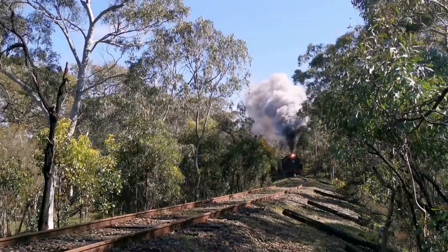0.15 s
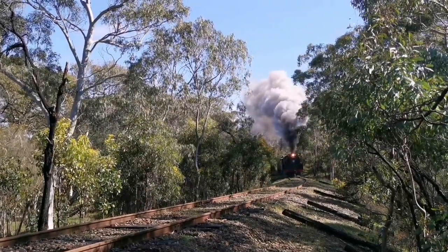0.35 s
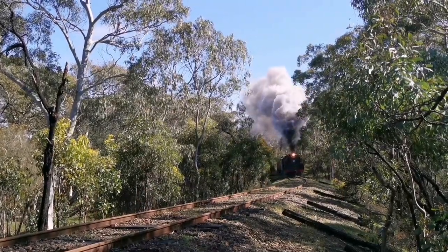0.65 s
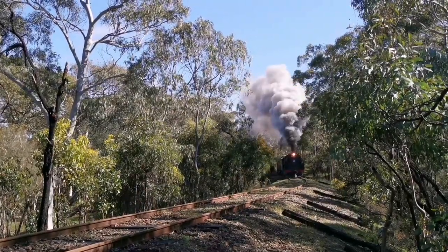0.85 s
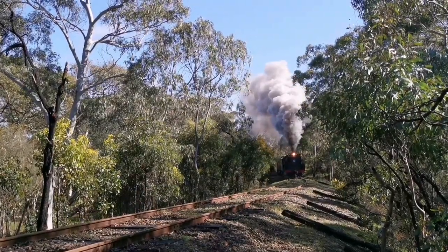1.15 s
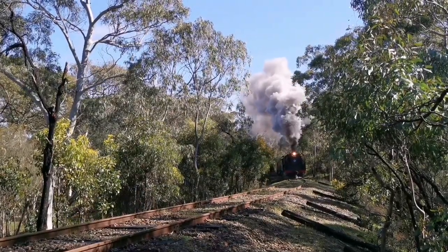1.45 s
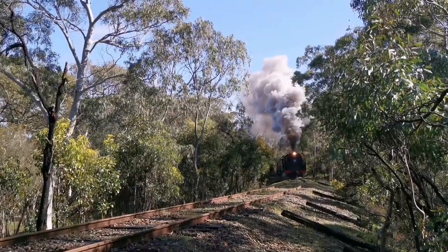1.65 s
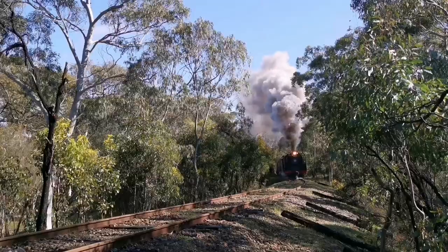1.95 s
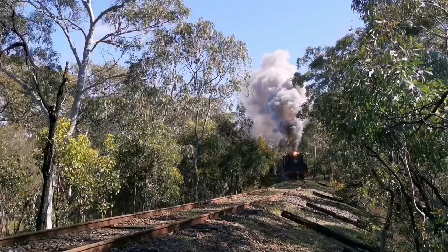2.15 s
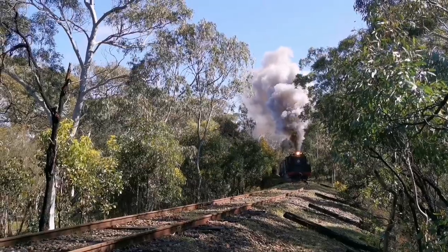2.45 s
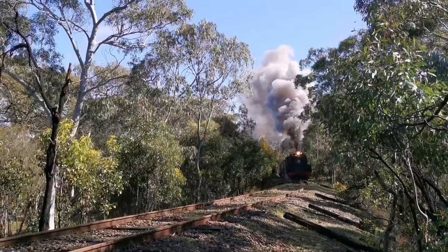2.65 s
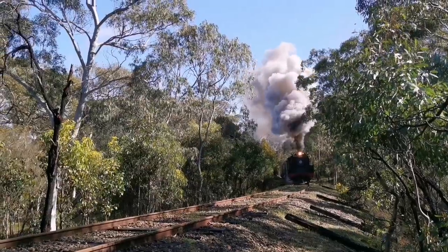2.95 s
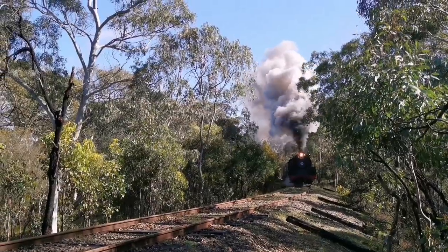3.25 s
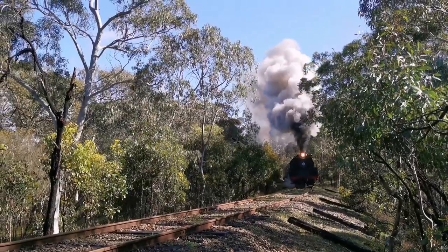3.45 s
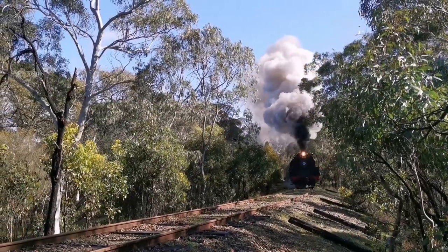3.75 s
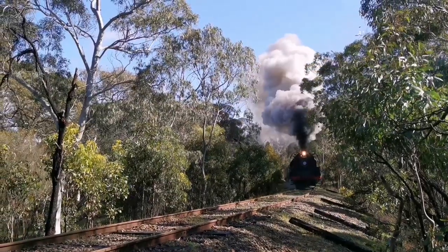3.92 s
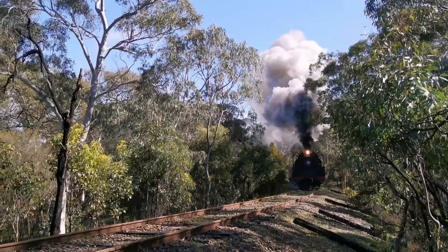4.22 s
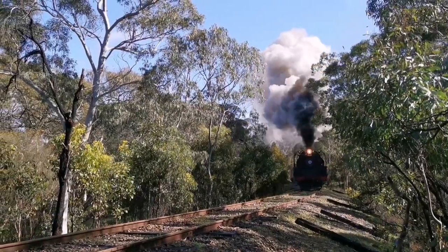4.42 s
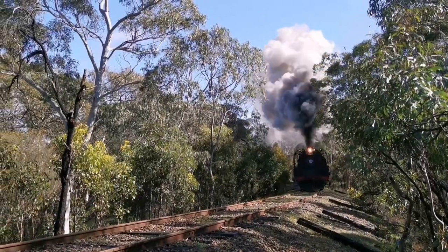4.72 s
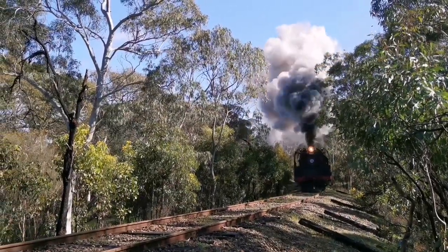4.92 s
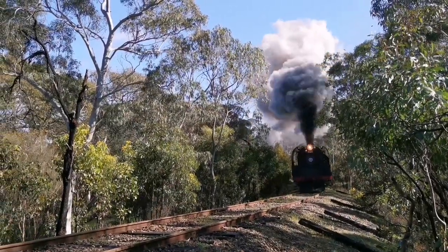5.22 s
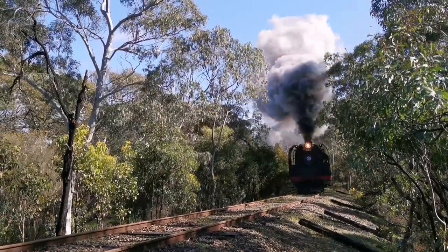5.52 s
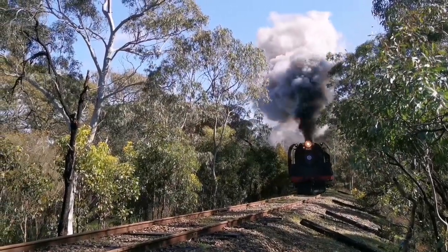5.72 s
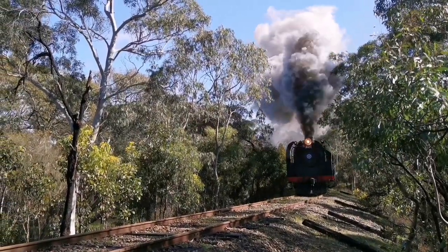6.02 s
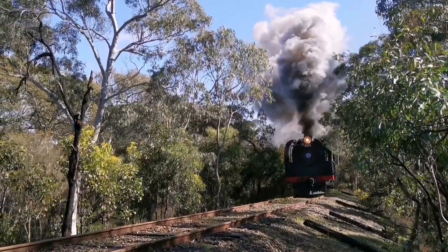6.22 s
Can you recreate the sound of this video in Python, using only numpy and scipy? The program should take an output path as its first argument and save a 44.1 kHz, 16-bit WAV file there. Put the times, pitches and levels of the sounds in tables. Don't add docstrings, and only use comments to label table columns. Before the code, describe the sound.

A steam locomotive works uphill toward a fixed stereo microphone beside a wooded track. Rapid, even exhaust chuffs, about five and a half a second in uneven groups of four, blast as rough hissing noise. Hollow low booms and soft pops flutter beneath, with wheel and rod rumble pulsing along. Everything gradually gets louder and fuller, blurred by short tree echo.

```python
import sys
import numpy as np
from scipy import signal
from scipy.fft import rfft, irfft, next_fast_len
from scipy.io import wavfile
from scipy.ndimage import uniform_filter1d, map_coordinates

SR = 44100
rng = np.random.default_rng(int(sys.argv[2]) if len(sys.argv) > 2 else 0)


def undo_db(level):
    steps = np.asarray(level, float) / 20
    return 10 ** steps


def wav_record(signal):
    frames = np.transpose(np.atleast_2d(signal))
    bounded = np.clip(frames, -1, 1)
    quanta = np.round(bounded * 32767).astype(np.int16)
    wavfile.write(sys.argv[1], SR, quanta)


N = 280910
TIME = np.arange(N) / SR

# beat 1 [level/dB], beat 2, beat 3, beat 4
STEAM = [
    (-45.5, -51, -46.5, -47),
    (-45.5, -51.5, -45, -46),
    (-46.5, -51, -46, -48),
    (-45, -50.5, -43, -44.5),
    (-44.5, -50.5, -45.5, -46.5),
    (-44.5, -51, -46.5, -47.5),
    (-45, -49, -43, -44.5),
    (-43, -48, -42.5, -42.5),
    (-41, -47.5, -43, -43.5),
]
# valve early [t/s], roar [level/dB], body [level/dB], blast longer [t/s]
CYLINDER_ENDS = [(0.019, -0.2, 0.35, 0.00074), (0.021, 2.1, -0.55, 0.00062), (0.016, -0.3, 0, 0.0032),
                 (0.016, -0.06, -0.05, -0.0034)]
# [t/s], roar over steam strength [level/dB], blast length [t/s]
WORKING = [
    (0, 11.5, 0.048),
    (.9, 8.5, 0.052),
    (1.8, 11.5, 0.044),
    (2.8, 9, 0.035),
    (3.6, 9, 0.043),
    (4.2, 7, 0.051),
    (5.2, 5, 0.053),
    (5.7, 5, .052),
    (6.4, 6.5, .064),
]
# [t/s], sizzle freed from air loss [level/dB], smokebox drone [level/dB]
APPROACH = [
    (0, -2.5, 6),
    (.8, -0.5, 8),
    (1.6, 2.5, 9.5),
    (2.4, 3, 11),
    (3.2, 3, 12),
    (4, 5, 12.5),
    (4.8, 3.5, 10),
    (5.6, 4.5, 10.5),
    (6.4, 3, 14.5),
]

# [f/Hz], [level/dB per Hz]
JET_LEFT = [(200, 3.5), (330, 2), (600, -4.5), (1000, -3.5), (1500, -1), (2500, -4), (3500, -9.5),
            (5000, -13.5), (6000, -19), (7300, -27), (7700, -42), (8200, -60), (9000, -45), (12200, -49),
            (13000, -64)]
# [f/Hz], [level/dB per Hz]
JET_RIGHT = [(200, 1), (330, 1), (650, -3), (1100, -5.5), (1700, -1), (2700, -7.5), (4000, -11.5),
             (5500, -4.5), (6600, -11), (7300, -21.5), (7700, -29.5), (10900, -22.5), (12400, -33),
             (13100, -49)]
# delay [t/ms], gain [ratio], dulling [f/Hz]
LEFT_WAYS = [(0.036, -0.54, 3580), (0.114, 0.97, 3620), (0.753, -0.003, 4300.0), (1.365, 0.15, 4000),
             (1.782, 0.32, 2400), (2.756, 0.22, 4320.0)]
# delay [t/ms], gain [ratio], dulling [f/Hz]
RIGHT_WAYS = [(0.027, 0.22, 20000.0), (0.225, 0.99, 2050), (1.029, -0.13, 7600), (1.267, 0.11, 10130.0),
              (1.72, 0.96, 1780), (2.976, 0.43, 3500)]
# [f/Hz], share of the common sound [ratio]
SCATTER = [(200, 0.089), (500, 0.18), (1500, 0.45), (4000, 0.29), (6000, 0.66), (8000, 1.2)]
# [f/Hz], fall by 60 dB [t/s]
TREES = [(150, 0.85), (600, 0.89), (2000, 1), (6000, 0.76), (12000, 0.77)]

# [f/Hz], width [f/Hz], [level/dB]
SMOKEBOX = [(205, 56, -5.5), (162, 23, -11.5), (97, 50, -22)]
# [t/s], peak [level/dB], pitch [f/Hz], half-height length [t/s]
PUFFS = [(0.031, -24.5, 212, 0.021), (0.21, -30, 162, 0.036), (0.411, -26.5, 206, 0.038),
         (0.576, -26.5, 199, 0.016), (0.766, -25, 218, 0.022), (1.129, -22, 208, 0.031),
         (1.474, -24.5, 180, 0.025), (1.693, -27.5, 203, 0.019), (2.015, -24, 210, 0.048),
         (2.225, -26, 217, 0.029), (2.603, -25, 172, 0.025), (2.746, -25.5, 226, 0.034),
         (3.101, -25, 215, 0.025), (3.134, -28, 200, 0.029), (3.3, -24, 220, 0.022),
         (3.657, -21, 205, 0.037), (3.859, -24.5, 187, 0.021), (4.207, -21, 201, 0.034),
         (4.445, -31, 195, 0.099), (4.759, -22, 202, 0.02), (4.792, -26.5, 198, 0.034),
         (4.912, -18.5, 206, 0.022), (4.948, -24, 208, 0.037), (5.097, -20, 198, 0.057),
         (5.482, -18, 209, 0.029), (5.611, -26.5, 201, 0.037), (6.023, -22, 189.6, 0.057),
         (6.193, -18.5, 198, 0.044), (6.28, -30, 183, 0.024), (6.343, -26, 223, 0.03)]
# [t/s], peak [level/dB]
POPS = [(0.376, -29.5), (0.62, -28), (0.67, -28.5), (0.793, -28), (1.166, -27), (1.498, -26.5),
        (1.646, -25.5), (1.827, -27), (1.855, -28), (1.881, -23), (1.997, -25), (2.195, -25.5), (2.4, -24),
        (2.563, -24), (2.923, -21.5), (3.46, -19), (4.004, -21), (4.07, -23.5), (4.17, -28), (4.53, -26),
        (4.555, -17), (4.72, -28), (5.302, -24), (5.654, -25), (5.832, -20.5), (5.878, -18.5), (5.801, -26),
        (5.967, -22.5), (5.986, -22.5)]
# [f/Hz], [level/dB per Hz]
RUMBLE = [(8, -22), (16, -2.5), (30, -1.5), (45, -6), (70, -1), (100, -4), (135, -4), (175, -30),
          (310, -120)]

# [f/Hz], [level/dB]
PORT_HISS = [(6000, -110), (8250, -105), (8500, -70.5), (12000, -72), (15000, -70), (15700, -78)]
# [f/Hz], [level/dB]
MASKED = [(2500, -30.5), (3500, -18), (5000, -31), (7000, -23), (7700, -10), (8600, -4.5), (10500, 0),
          (11500, 1), (12600, -9), (14500, -2)]
# [f/Hz], [level/dB]
FAINTEST_LEFT = [(5000, -83), (6600, -71), (7300, -62), (8200, -62), (8500, -66), (11500, -68),
                 (16000, -68.5)]
# [f/Hz], [level/dB]
FAINTEST_RIGHT = [(5000, -90), (7300, -68), (7700, -57), (8300, -67), (8600, -68), (11100, -69),
                  (11400, -53), (12700, -54), (13000, -70), (16000, -69)]

BEAT_S, OPENING_S = 0.1808, 0.015
BODY_HZ, HISS_HZ, SIZZLE_HZ = 950, 3800, 7880
BODY_DB, BODY_DB_PER_S, BODY_FOLLOWS = -40, 0.44, 0.22
SURGE_DB, SURGES_PER_S = 1.08, 90
JOINT_HZ = 5150
POP_HZ, POP_S = 193, 0.0135
THRUST_DB, THRUST_DB_PER_S, THRUST_FOLLOWS = -39, 0.54, 0.4
ROLL_DB, THRUST_LAG_S = -46, -0.0077


def unit(x):
    return x / np.sqrt(np.mean(x ** 2) + 1e-20)


def along(points, hz):
    f, v = np.transpose(points)
    return np.interp(np.log(hz + 1), np.log(f + 1), v)


def filtered(x, response):
    m = next_fast_len(N + SR // 10)
    hz = np.fft.rfftfreq(m, 1 / SR)
    return irfft(rfft(x, m) * response(hz), m)[..., :N]


def above(hz, edge_hz, order=6):
    return 1 / (1 + (edge_hz / (hz + 1)) ** order)


def patchy(count, depth_db):
    z = signal.stft(rng.standard_normal((count, N + 512)), nperseg=512)[2]
    field = rng.standard_normal((2, *z.shape[1:]))
    eddies = uniform_filter1d(uniform_filter1d(field[0], size=3, axis=0), size=5, axis=1)
    billows = uniform_filter1d(uniform_filter1d(field[1], size=9, axis=0), size=12, axis=1)
    gain_db = depth_db * (unit(eddies) + 0.64 * unit(billows))
    return unit(signal.istft(z * undo_db(gain_db), nperseg=512)[1][:, :N])


def beats():
    steam = np.ravel(STEAM)
    early, end_roar, end_body, longer = np.tile(np.transpose(CYLINDER_ENDS), len(STEAM))
    start = np.arange(len(steam)) * BEAT_S - early
    at, over, hold = np.transpose(WORKING)
    roar = steam + end_roar + np.interp(start, at, over)
    body = BODY_DB + BODY_DB_PER_S * start + BODY_FOLLOWS * (steam - steam.mean()) + end_body
    return start, np.interp(start, at, hold) + longer, roar, body, steam


def blast(level_db, fall_s, slower, ragged_s=0.0016, late_s=0):
    power = np.zeros(N)
    starts, holds = beats()[:2]
    lags = ragged_s * rng.standard_normal(len(starts))
    for s, hold, db, lag in zip(starts + late_s, holds, level_db, lags):
        span = slice(max(round((s - 0.06) * SR), 0), round((s + 0.69) * SR))
        t = TIME[span] - s
        rise = 1 / (1 + np.exp((0.92 * OPENING_S + lag - t) / (slower * 0.007)))
        emptying_s = np.clip(t - OPENING_S - hold + 0.001, 0, None)
        power[span] += (undo_db(db - 60 * emptying_s / fall_s) * rise) ** 2
    return np.sqrt(power)


def jet():
    roar, body, steam = beats()[2:]
    clear_air = undo_db(np.interp(TIME, *np.transpose(APPROACH)[:2]))
    noise = patchy(count=3, depth_db=2.1)
    registers = [
        (blast(body + 1.26, fall_s=1.0, slower=0.68),
         lambda f: 1 - above(f, BODY_HZ)),
        (blast(roar, fall_s=0.22, slower=1.12),
         lambda f: above(f, BODY_HZ) - above(f, HISS_HZ)),
        (blast(steam + 8.4, fall_s=0.27, slower=1.0),
         lambda f: above(f, HISS_HZ) - above(f, SIZZLE_HZ, order=30)),
        (clear_air * blast(steam + 9.37, fall_s=0.34, slower=1.5),
         lambda f: above(f, SIZZLE_HZ, order=30))]
    surge_db = SURGE_DB * map_coordinates(rng.standard_normal(N // 100), [TIME * SURGES_PER_S])
    gated = sum(flow * filtered(noise, lambda f: np.sqrt(abs(share(f)))) for flow, share in registers)
    return undo_db(surge_db) * gated


def ways(table, hz):
    comb = sum(g * np.exp(-(hz / dull) ** 2 - 2j * np.pi * hz * ms / 1000) for ms, g, dull in table)
    width = round(600 / hz[1])
    slope = uniform_filter1d(uniform_filter1d(np.log(abs(comb) + 1e-9), width), width)
    return np.where(hz < JOINT_HZ, comb / np.exp(slope), 1)


def trees(x, channels):
    hz, t, z = signal.stft(rng.standard_normal((channels, SR)), SR, nperseg=256)
    fall = undo_db(-60 * t / along(TREES, hz)[:, None])
    tail = signal.istft(z * fall, SR, nperseg=256)[1]
    tail *= 1 - np.exp(-np.arange(tail.shape[1]) / (0.019 * SR))
    return signal.fftconvolve(x[None], tail / np.linalg.norm(tail[0]), axes=1)[:, :N]


def chimney():
    shared, *own = jet()
    ports = lambda f: np.array([ways(LEFT_WAYS, f), ways(RIGHT_WAYS, f)])
    scattered = filtered(np.array(own), lambda f: along(SCATTER, f))
    echo = undo_db(-7.5) * trees(shared, channels=2)
    grazing = filtered(scattered + echo, lambda f: abs(ports(f)) ** 0.45)
    port_gain = lambda f: undo_db([along(JET_LEFT, f), along(JET_RIGHT, f)])
    colour = lambda f: port_gain(f) / np.sqrt(1 + along(SCATTER, f) ** 2)
    return undo_db(12) * filtered(filtered(shared, ports) + grazing, colour)


def smokebox():
    modes = lambda f: sum(undo_db(db) * 1j * f * w / (c * c - f * f + 1j * f * w) for c, w, db in SMOKEBOX)
    steep = lambda f: modes(f) * (1 - above(f, 275.0, order=10))
    drone_db = np.interp(TIME, *np.transpose(APPROACH)[::2])
    flow = blast(np.full(np.size(STEAM), -43), fall_s=0.47, slower=1.44)
    boom = undo_db(drone_db) * flow * unit(filtered(rng.standard_normal(N), steep))
    puffs = PUFFS + [(s, db, POP_HZ, POP_S) for s, db in POPS]
    phases = rng.uniform(0, 2 * np.pi, len(puffs))
    for (s, db, hz, length), phase in zip(puffs, phases):
        span = slice(max(round((s - 0.08) * SR), 0), round((s + 0.08) * SR))
        t = TIME[span] - s
        swell = np.exp(-(1.93 * t / length) ** 2)
        boom[span] += undo_db(db + 0.9) * swell * np.sin(2 * np.pi * hz * t + phase)
    return boom + undo_db(-13) * trees(boom, channels=1)[0]


def rumble():
    steam = beats()[-1]
    accent_db = steam - uniform_filter1d(steam, size=4)
    thrust_db = THRUST_DB + THRUST_FOLLOWS * accent_db
    thrust = blast(thrust_db, fall_s=0.5, slower=1.8, late_s=THRUST_LAG_S)
    level = undo_db(THRUST_DB_PER_S * TIME) * np.hypot(thrust, undo_db(ROLL_DB))
    mid, side = filtered(patchy(count=2, depth_db=1.0), lambda f: undo_db(along(RUMBLE, f)))
    return level * unit(np.array([mid + 0.051 * side, 0.85 * mid - 0.1 * side]))


def port_hiss():
    return filtered(patchy(count=2, depth_db=1.5), lambda f: undo_db(along(PORT_HISS, f)))


def camera(x, size=1024, count=256):
    lead = 2 * size - 388
    n = np.arange(2 * size) + 0.5
    k = np.arange(size) + 0.5
    window = np.sin(np.pi * n / size / 2)[:, None]
    basis = window * np.cos(np.pi / size * np.outer(n + size / 2, k)) * np.sqrt(2 / size)
    halves = np.pad(x, ((0, 0), (lead, 2 * size - (N + lead) % size))).reshape(2, -1, size)
    lines = np.concatenate([halves[:, :-1], halves[:, 1:]], axis=2) @ basis
    power = np.mean(lines.reshape(2, -1, count, size // count) ** 2, axis=3)
    hz = (np.arange(count) + 0.5) * SR / count / 2
    around = uniform_filter1d(power, size=39, axis=2) * undo_db(2 * along(MASKED, hz))
    sizzle = power[..., (hz > 8500) & (hz < 11000)].mean(axis=2, keepdims=True)
    around += undo_db(-35) * sizzle * (hz > 12700)
    faint = undo_db([2 * along(FAINTEST_LEFT, hz), 2 * along(FAINTEST_RIGHT, hz)])[:, None]
    whim = uniform_filter1d(rng.standard_normal(power.shape), size=2, axis=1)
    whim_db = 6.5 * uniform_filter1d(whim, size=3)
    keep = power > np.maximum(faint, around) * undo_db(2 * whim_db)
    blocks = (lines * np.repeat(keep, size // count, axis=2)) @ basis.T
    halves[:, 1:-1] = blocks[:, 1:, :size] + blocks[:, :-1, size:]
    return halves.reshape(2, -1)[:, lead:lead + N]


def scene():
    return chimney() + smokebox() * undo_db([[0.4], [-0.4]]) + rumble()


def roll_off(x):
    return signal.sosfilt(signal.butter(12, 15720, fs=SR, output="sos"), x)


def record(dry):
    hiss = port_hiss()
    squeezed = dry / (1 + abs(dry / 0.27) ** 4) ** 0.25
    mix = camera(squeezed + hiss) - 0.0003
    return roll_off(mix)


dry = scene()
out = record(dry)
wav_record(out)
```